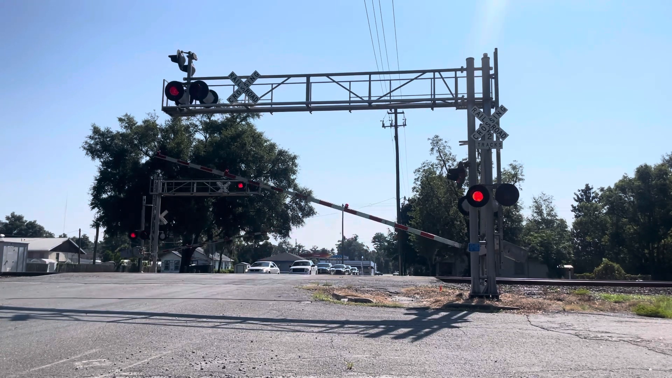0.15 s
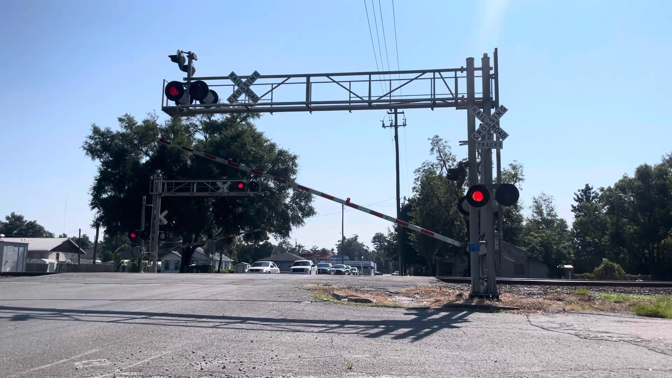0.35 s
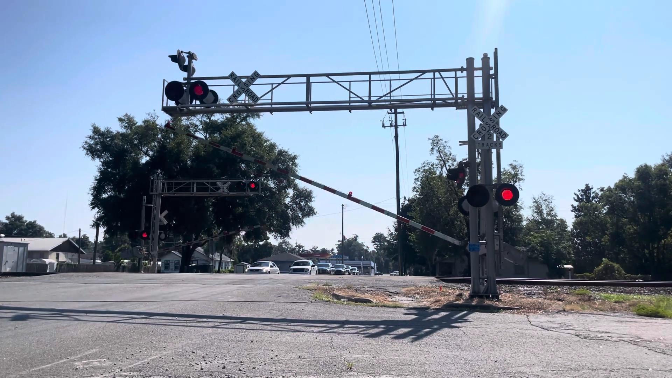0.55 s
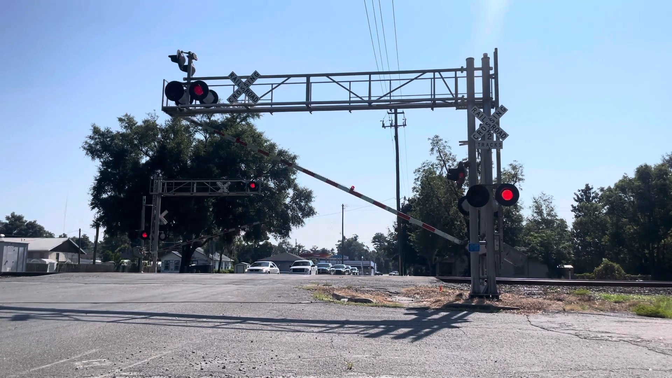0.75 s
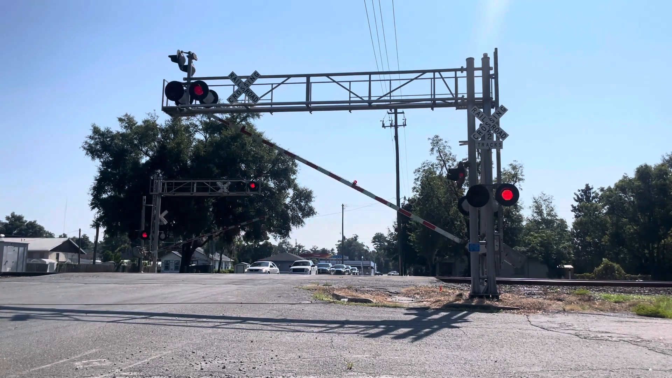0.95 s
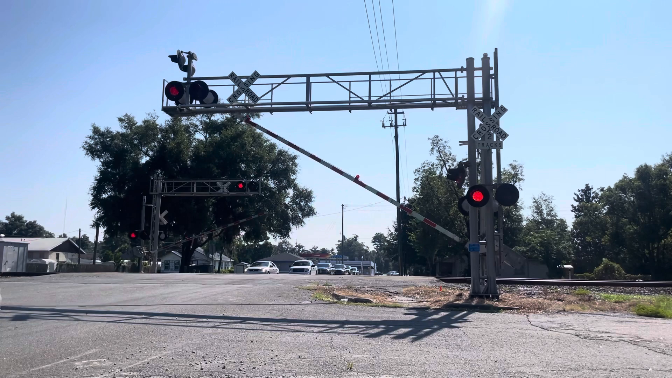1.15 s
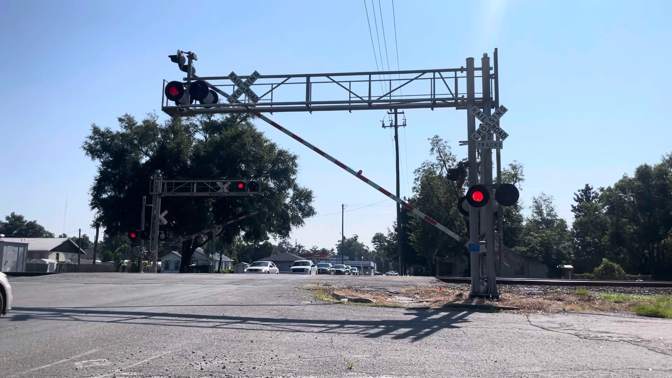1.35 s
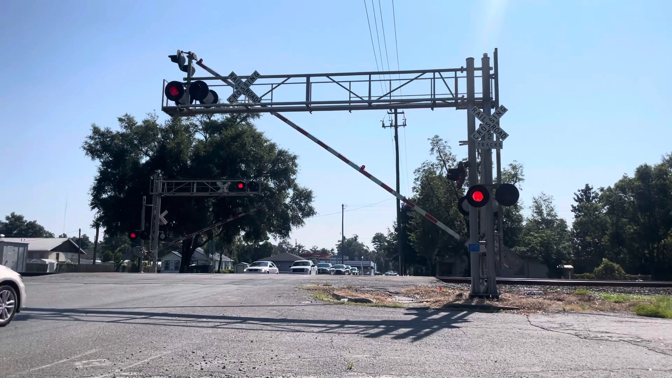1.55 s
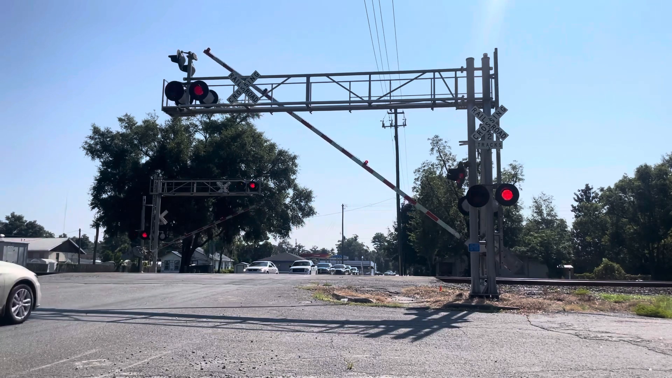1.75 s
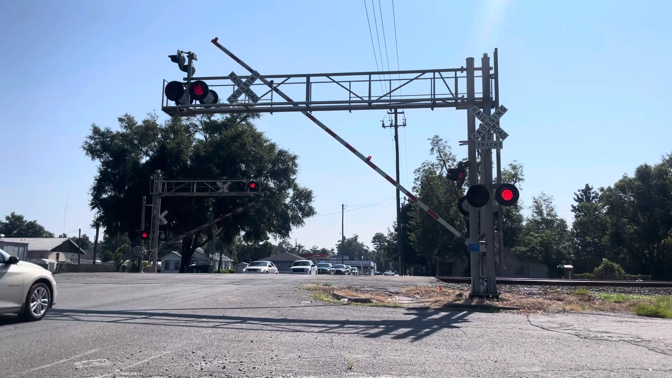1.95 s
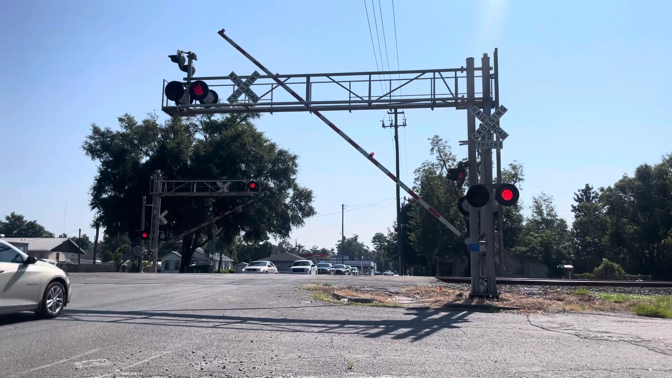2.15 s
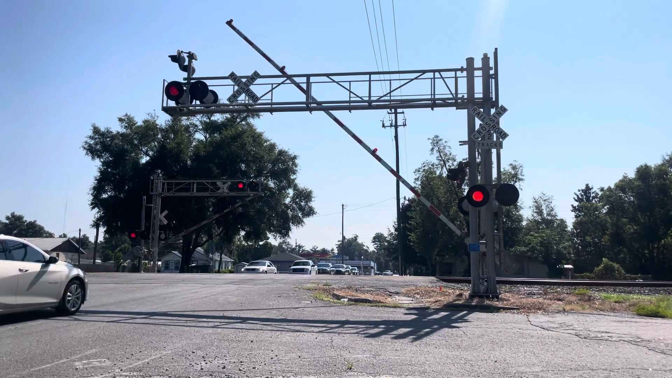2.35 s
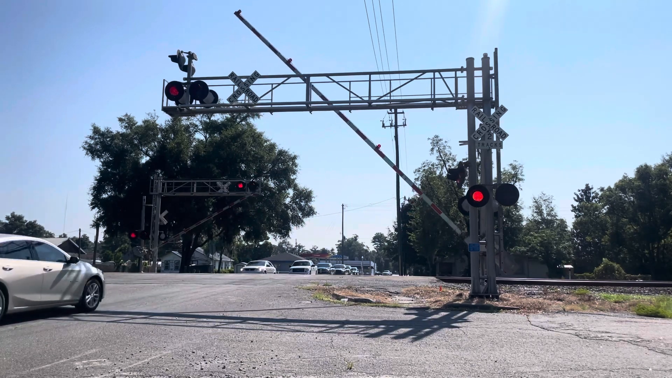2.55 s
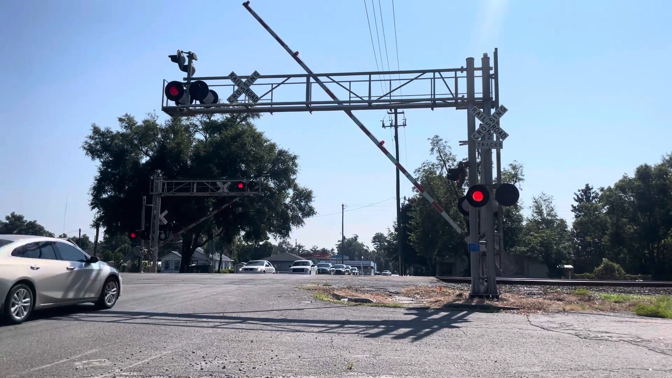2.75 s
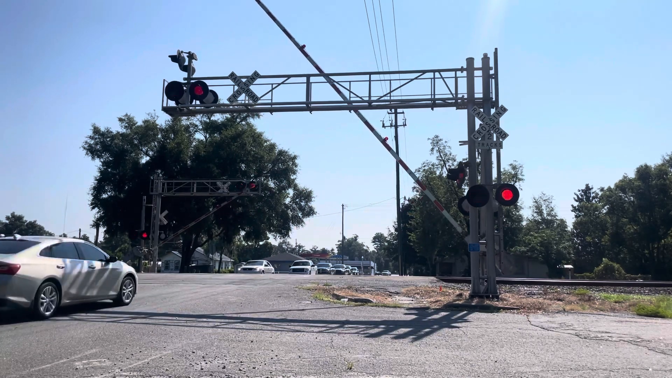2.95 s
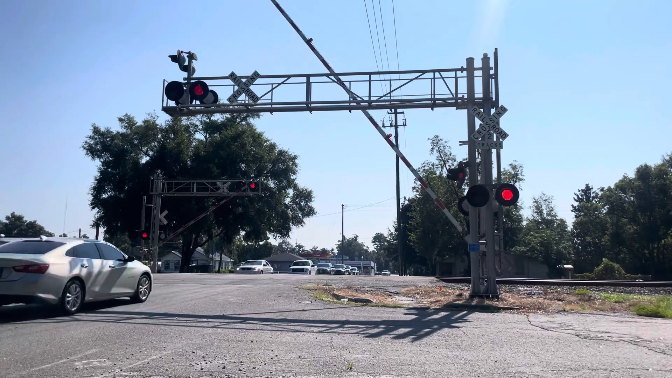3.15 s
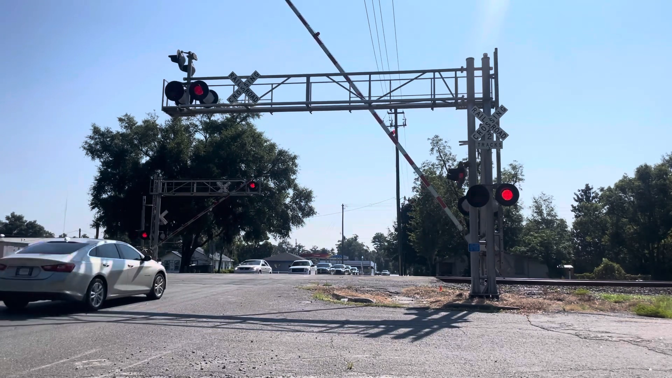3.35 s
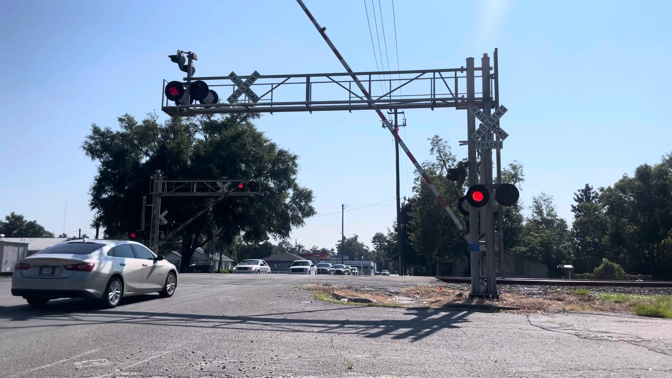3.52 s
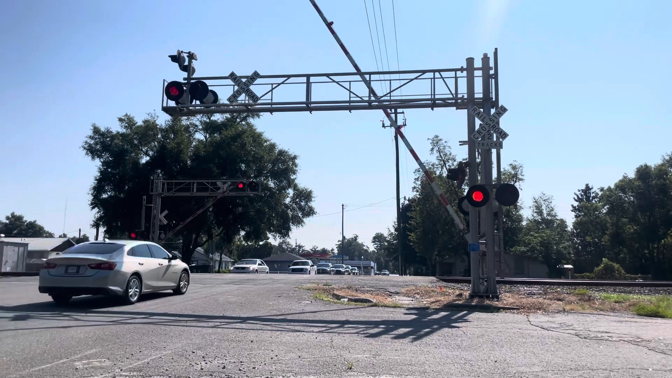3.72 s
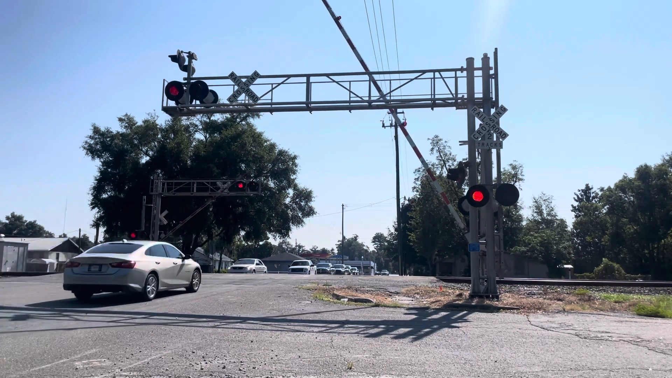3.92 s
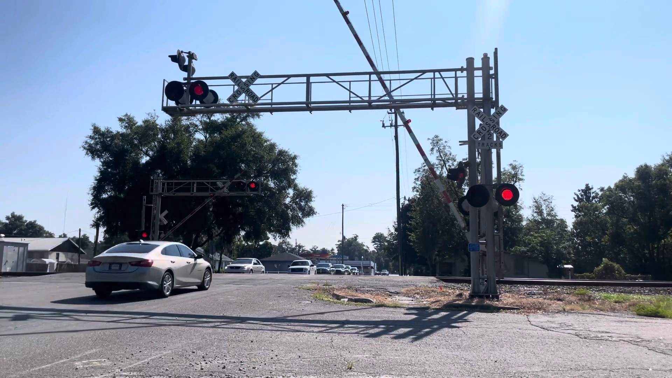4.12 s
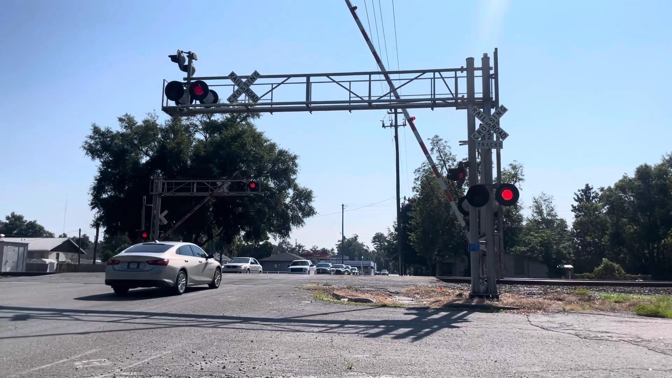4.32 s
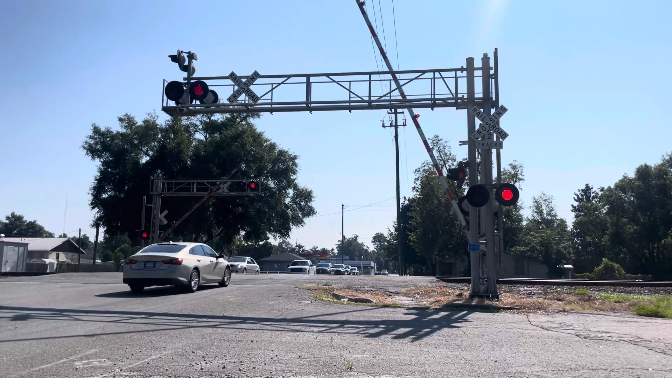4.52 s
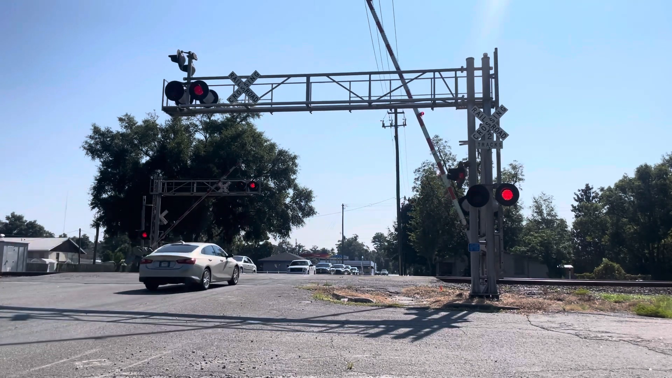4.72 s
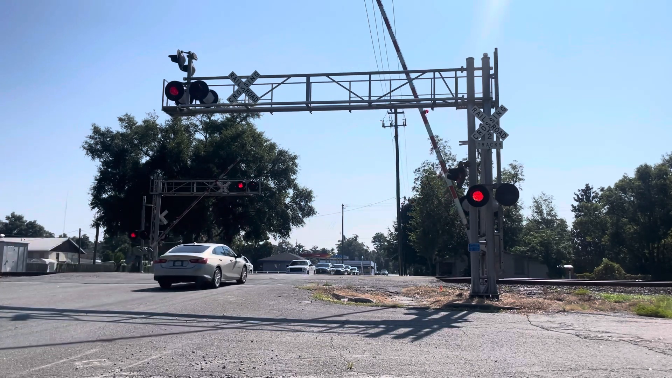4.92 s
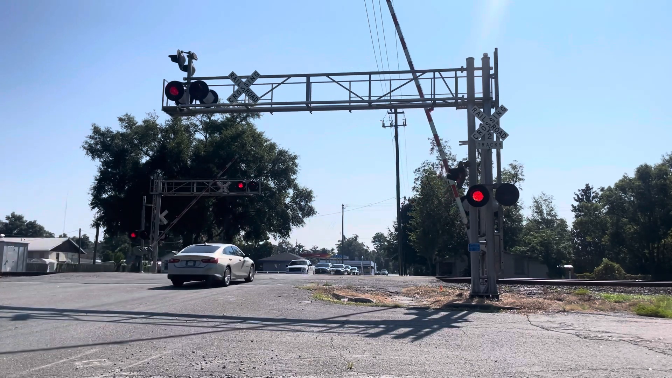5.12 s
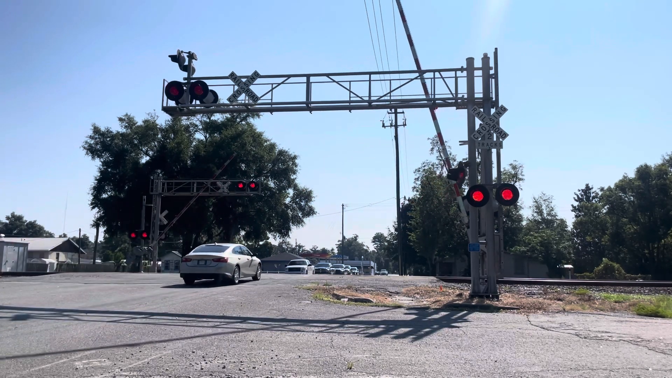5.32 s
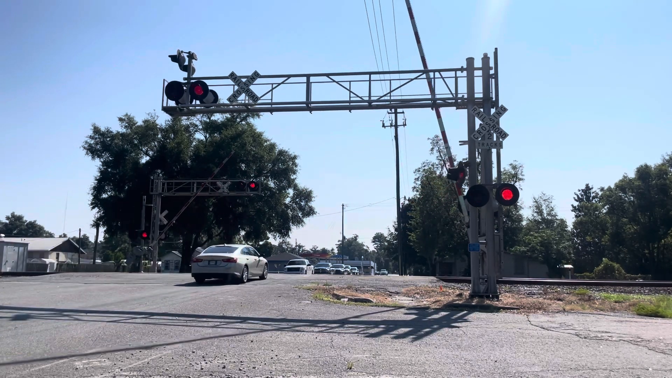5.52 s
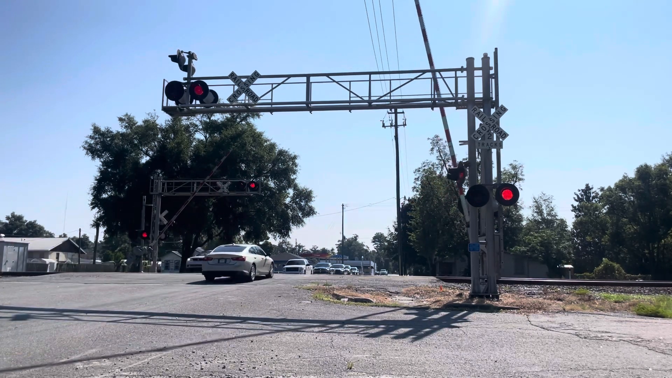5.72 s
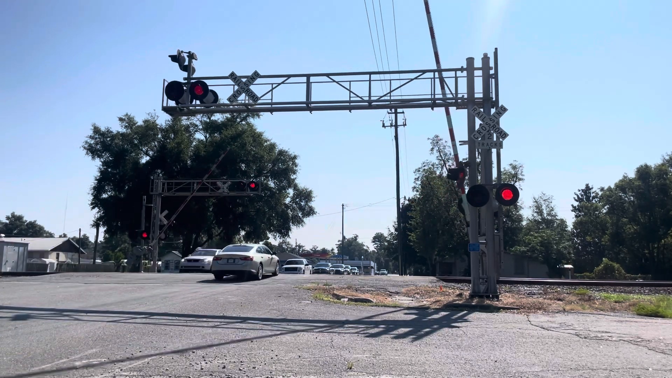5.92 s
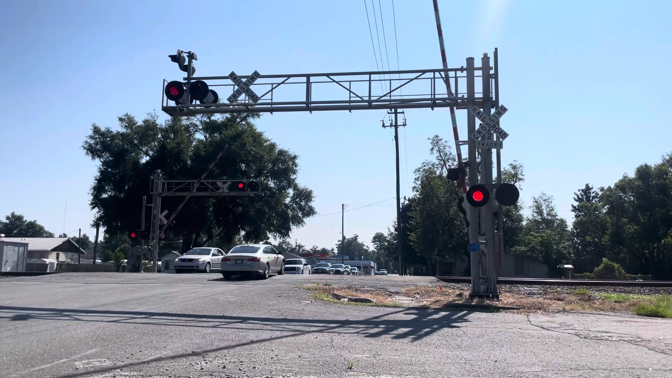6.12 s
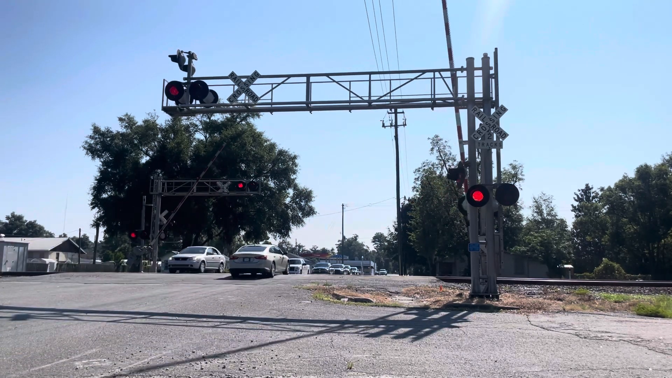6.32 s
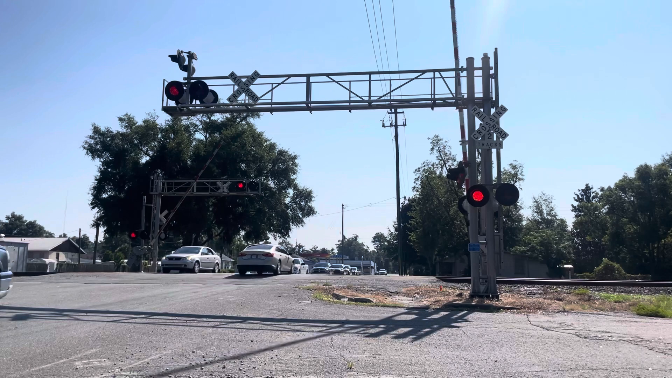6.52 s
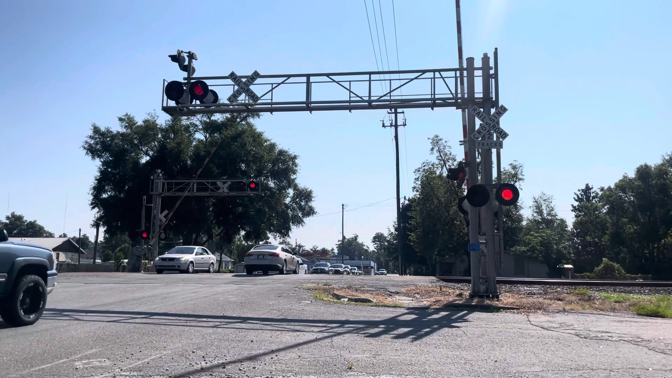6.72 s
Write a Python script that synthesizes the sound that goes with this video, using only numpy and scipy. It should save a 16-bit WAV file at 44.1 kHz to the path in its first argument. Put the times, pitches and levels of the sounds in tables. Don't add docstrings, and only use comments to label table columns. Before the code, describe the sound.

Quiet traffic rumble and faint brake squeaks, then a deep pickup exhaust surges, swells steadily nearer and rattles its metal bed hard.

```python
import sys
import numpy as np
from scipy import signal
from scipy.fft import rfft, irfft, next_fast_len
from scipy.io import wavfile
from scipy.ndimage import uniform_filter1d, minimum_filter1d, map_coordinates

SR = 44100
rng = np.random.default_rng(int(sys.argv[2]) if len(sys.argv) > 2 else 0)


def linear_from_db(decibels):
    return 10 ** (np.asarray(decibels, float) / 20)


def unload_audio(sound):
    columns = np.transpose(np.atleast_2d(sound))
    steps = np.round(np.clip(columns, -1, 1) * 32767)
    wavfile.write(sys.argv[1], SR, steps.astype(np.int16))


N = 302967
T = np.arange(N) / SR

# t/s, exhaust level/dB, overtones against the firing tone/dB
THROTTLE = [(0, -38, 3), (.63, -42, 6), (.93, -32, 0), (1.7, -33, -0.5), (2.05, -35, -2), (2.45, -34.5, 3),
            (2.56, -26.5, 0.5), (2.72, -19.5, -0.5), (2.9, -18, -1.5), (3.05, -17, -4), (3.6, -19, -0.5),
            (4.4, -17, 2), (4.75, -15.5, 0.2), (5.6, -15, 1.1), (5.9, -12.5, -2), (6.4, -9, -3),
            (6.87, -8.5, -8.5)]
# t/s, firing rate f/Hz
SPEED = [(.63, 35.2), (.93, 42.3), (1.7, 39.8), (2.43, 33.7), (2.7, 45.5), (3.02, 77.5), (3.21, 84.7),
         (3.67, 77.5), (4.1, 80.6), (4.4, 79.7), (4.72, 83.5), (5.0, 84.3), (5.32, 88.2), (5.6, 88.3),
         (5.85, 91.7), (6.15, 92.3), (6.47, 95.1), (6.87, 92)]
# t/s, nearness level/dB, lead of the left port/ms
APPROACH = [
    (0, -0.5, 1),
    (5, 0.5, 0.96),
    (5.7, 1.4, 0.81),
    (6.4, 5, 0.57),
    (6.87, 5.5, .38),
]
# f/Hz, level/dB
MUFFLER = [(39, -8), (62, -2), (90, 0.5), (115, -3.5), (145, -2), (185, -3), (240, -13), (330, -28.5)]
# multiple of the firing rate, level/dB
BURBLE = [(.375, -38), (.5, -37), (.625, -12), (.75, -30), (.875, -19), (1, 0), (1.125, -21), (1.25, -23),
          (1.375, -19), (1.5, -22), (1.625, -21), (1.75, -16), (1.875, -19), (2, 0), (2.125, -21),
          (2.25, -11), (2.375, -25), (2.5, -31), (2.625, -22), (2.75, -29), (2.875, -32), (3, 0),
          (3.125, -32), (3.25, -30), (3.375, -37), (3.5, -36), (3.625, -32), (3.75, -36)]
# f/Hz, level/dB
PIPE = [(15, -36.5), (35, -20), (55, -4.5), (90, -1.5), (200, 0.5), (300, -9.5), (450, -14.5), (600, -15.5)]
# t/s, centre f/Hz, level/dB, length/s
BARK = [(4.3, 415, -50, .3), (5.2, 460, -44, .55), (5.1, 358, -45, .22), (5.8, 287, -41, .4),
        (6.3, 325, -44, .35), (6.55, 415, -44, .4), (4.3, 288, -47, .3), (6.55, 248, -33, .3)]
BARK_HZ_PER_S, BARK_WIDTH_HZ = 47, 18
LOPE_DB, LOPE_BELOW_HZ, LOPE_SPAN_HZ = 2.5, 55, 15
BURBLE_DB, BURBLE_GROWS = -17, 0.44
CRUISE_DB, CRUISE_HZ = -7, (58, 70, 84.5, 88)
DULLING = 0.45

# f/Hz, level/dB
ROAR = [(140, -28.5), (230, -2), (291, -12), (393, -11), (462, -9), (609, -13.5), (803, -15), (871, -16.5),
        (1600, -28), (2080, -66), (3520, -120)]
ROAR_DB, ROAR_GROWS = -43, 0.17
# f/Hz, level/dB
FAN = [(2350, -21.5), (4000, -6.5), (5450, -7.5), (6650, -5), (7030, -8.0), (7650, -12), (8610, -16),
       (10000, -12.5), (11700, -14.5), (12300, -22.5), (16000, -50), (22000, -120)][:-2] + [(14000, -13.5),
       (15800, -23.5)]
SPIN_HZ = 81.4
FAN_DB, FAN_DB_PER_HZ, FAN_SPAN_HZ = -58.5, 0.393, 9
WHINE_DB, WHINE_DB_PER_HZ, WHINE_IDLE_DB = -62, 0.755, -76.5
# f/Hz, level/dB per Hz
TRAFFIC = [(12, -38.5), (20, -15.5), (65, -5.5), (145, -7.5), (170, -7), (308, -21), (500, -28.5),
           (650, -45), (1100, -120)]
# f/Hz, level/dB
TYRES = [(760, -42), (1300, -0.5), (1370, -15), (1690, -0.5), (1830, 0), (2040, -1.5), (2390, 1),
         (2530, -0.5), (2740, -1.5), (3360, -4.5), (4300, -22.5), (5590, -47.5), (9460, -120)]
# t/s, level/dB
ROLL = [
    (0, -58),
    (2.3, -57.5),
    (3.15, -53),
    (4.1, -52),
    (5.2, -52.5),
    (6, -55),
    (6.87, -53.5),
]
INSECTS_DB, INSECTS_HZ, INSECTS_WIDTH_HZ = -61, 5600, 1300
INSECTS_FADE_S, INSECTS_FADE_DB = (1.1, 2.0), -15

# t/s, level/dB, centre f/Hz, hold/s
SQUEALS = [
    (0.682, -51, 9670, 0.089),
    (1.57, -50.5, 9500, 0.066),
    (2.549, -51.5, 9500, 0.09),
]
SQUEAL_RISE_DB_S, SQUEAL_FALL_DB_S = 167, 188
# t/s, f/Hz, level/dB
CAR = [
    (0.7, 42.2, -59.5),
    (1, 46.3, -33),
    (1.3, 50.1, -44),
    (1.8, 55.7, -32),
    (2.3, 57.1, -38),
    (2.6, 61, -35),
    (2.9, 57.4, -53),
]
# start t/s, length/s, from f/Hz, to f/Hz, from level/dB, to level/dB
CHIRP = (2.455, .28, 6090, 6650, -60, -61)
# start t/s, length/s, from f/Hz, to f/Hz, from level/dB, to level/dB
CREAK = (4.09, .17, 4050, 2500, -70, -66)

# share of the engine cycle, level/dB
VALVES = [(0, 0), (.3, -7), (.64, -6)]
# t/s, peak level/dB, f/Hz
TICKING = [
    (2.64, -38, 6400),
    (3.1, -42, 6200),
    (3.6, -47, 5900),
    (4, -44, 5600),
    (4.6, -48, 5600),
]
TICK_S = 3.233
TICK_SCATTER_DB, TICK_SCATTER_HZ, TICK_T60_S = 2.5, 350, .01

# t/s, peak level/dB
KNOCKS = [(6.381, -20), (6.472, -18.5), (6.487, -17.5), (6.501, -16), (6.527, -16.5), (6.542, -19),
          (6.557, -19.5), (6.574, -28.5), (6.608, -22.5), (6.624, -29.5), (6.647, -33.5)]
# f/Hz, width/Hz, level/dB
BED = [(765, 20, -1.5), (930, 9, -14), (898, 21, -3.5), (967, 30, -5), (1057, 37, -12.5), (1227, 20, -10),
       (1350, 27, -13.5), (1480, 30, -21.5), (1597, 24, -14), (1760, 14, -16), (2100, 92, -27.5),
       (2090, 27, -13.5), (2626, 25, -43), (3060, 29, -25.5)]
RING_DB, KNOCK_T60_S = -7, 0.17
RATTLE_DB, RATTLE_GROWS = -30.5, 0.83
# t/s, level/dB
GONG = [
    (6.497, -28.5),
    (6.552, -26),
]
GONG_RISE_DB_S, GONG_FALL_DB_S, GONG_HOLD_S = 700, 550, .014

# f/Hz, side minus mid level/dB
PORTS = [(60, -20.5), (110, -22), (200, -3), (380, 0.5), (700, 5), (1290, 6.5), (2380, -5.5), (4400, -2),
         (8120, 2), (15000, 0)]
# f/Hz, share tied to it
LINK = [(60, .8), (250, 0.83), (500, .7), (1000, .6), (4000, .55), (9000, 0.41)]
# f/Hz, angle/rad
TURN = [(60, -0.5), (250, 1.46), (1050, 0.63), (1250, -1.5), (2600, -1.4), (3000, 2.3), (3800, 1),
        (4300, 3), (6500, 4.5)]


def unit(x):
    return x / np.sqrt(np.mean(x ** 2) + 1e-20)


def along(points, hz):
    f, v = np.transpose(points)
    return np.interp(np.log(hz + 1), np.log(f + 1), v)


def curves(rows, t=T):
    s, *cols = np.transpose(rows)
    return [np.interp(t, s, c) for c in cols]


def wobble(rate, t=T):
    return map_coordinates(rng.standard_normal(int(N * rate / SR) + 4), [t * rate])


def filtered(x, response):
    m = next_fast_len(N + 8192)
    return irfft(rfft(x, m) * response(np.fft.rfftfreq(m, 1 / SR)), m)[..., :N]


def hump(x, centre, width):
    return np.exp(-.5 * ((x - centre) / width) ** 2)


def colour(spectrum):
    return lambda hz: linear_from_db(along(spectrum, hz))


def noise(response, patchy_db):
    z = signal.stft(rng.standard_normal((2, N)), nperseg=512)[2]
    field = uniform_filter1d(rng.standard_normal(z.shape[1:]), size=2, axis=0)
    field = uniform_filter1d(field, size=50, axis=1)
    patchy = signal.istft(z * linear_from_db(patchy_db * unit(field)), nperseg=512)[1][:, :N]
    return unit(filtered(patchy, response))


def swell(s, db, hold_s, rise_db_s, fall_db_s):
    early = (s - hold_s / 2 - T).clip(0)
    late = (T - s - hold_s / 2).clip(0)
    return linear_from_db(db - rise_db_s * early - fall_db_s * late)


def glide(slip, fuzz_hz):
    s, length, from_hz, to_hz, from_db, to_db = slip
    hz, db = curves([(s, from_hz, from_db), (s + length, to_hz, to_db)])
    on = uniform_filter1d(1. * (T > s) * (T < s + length), size=600)

    def voice():
        phase = 2 * np.pi * np.cumsum(hz + fuzz_hz * wobble(200)) / SR
        return np.cos(phase) * linear_from_db(3.4 * wobble(60))

    return linear_from_db(db + 6) * on * np.array([voice(), voice()])


def tick_train(events):
    out, t = np.zeros((2, N)), T[:900]
    rise = np.minimum(t / .0005, 1)
    for s, db, hz in events:
        shake = 1 + .8 * rng.standard_normal((2, len(t)))
        ring = linear_from_db(db + 6 - 60 * t / TICK_T60_S) * rise * np.sin(2 * np.pi * hz * t)
        out[:, round(s * SR):][:, :len(t)] += ring * shake
    return filtered(out, lambda f: hump(f, 5900, 1100))


def engine():
    t = T[::21]
    level_db, tone_db = curves(THROTTLE, t)
    hz = uniform_filter1d(curves(SPEED, t)[0], size=200)
    lead_ms = curves(APPROACH, t)[1]
    burble_db = BURBLE_DB + BURBLE_GROWS * (level_db + 18.5)
    lope_db = LOPE_DB * np.clip((LOPE_BELOW_HZ - hz) / LOPE_SPAN_HZ, 0, 1)
    turn = 2 * np.pi * np.cumsum(hz) * t[1]
    out = np.zeros((2, len(t)))

    def firing_db(k):
        db = level_db + along(MUFFLER, k * hz) + tone_db * (k > 1)
        db = db - DULLING * (level_db + 33.5).clip(0) * (k > 2)
        return db + lope_db * wobble(4.08, t)

    def add(k, size, start):
        lead = np.pi * k * hz * lead_ms / 1000
        lean = linear_from_db(np.clip(k * hz / 160 - .3, 0, 1.6))
        for ch, sign in enumerate((1, -1)):
            tone = np.cos(k * turn + start + sign * lead) / np.cos(lead).clip(.5)
            out[ch] += np.sqrt(2) * size * lean ** sign * tone

    for k, db in BURBLE:
        k = round(8 * k) / 8
        drift = .12 * k * wobble(1.5, t)
        if k % 1 == 0:
            add(k, linear_from_db(firing_db(k) + 0.54 * wobble(6, t)), np.pi + 0.13 * drift)
        else:
            level = db + burble_db + along(PIPE, k * hz) - along(PIPE, k * 88) + 1.5 * wobble(2.5, t)
            level += CRUISE_DB * np.interp(hz, CRUISE_HZ, (0, 1, 1, 0)) * (1.4 < k < 2.2)
            add(k, linear_from_db(level), rng.uniform(0, 2 * np.pi) + drift)
    for k, db in ((4, 1.5), (5, -5), (6, -8)):
        add(k, linear_from_db(firing_db(k) + db + 1.5 * wobble(5, t)), np.pi)
    for k in np.arange(20, 50) / 8:
        band = 0
        for s, centre_hz, db, length in BARK:
            lifted_hz = centre_hz + BARK_HZ_PER_S * (t - s)
            band = band + linear_from_db(db) * hump(t, s, length) * hump(k * hz, lifted_hz, BARK_WIDTH_HZ)
        add(k, linear_from_db(2.0 * wobble(2.37, t)) * band + linear_from_db(burble_db - 64.5), 1.1 * wobble(2, t))
    return signal.resample_poly(out, 21, 1, axis=1)[:, :N], np.interp(T, t, turn)


def roar(turn):
    level_db = ROAR_DB + ROAR_GROWS * (curves(THROTTLE)[0] + 20) + curves(APPROACH)[0]
    puffs = 1 + 0.049 * np.cos(turn)
    return linear_from_db(level_db + 0.13 + 0.84 * wobble(14)) * puffs * noise(colour(ROAR), patchy_db=1.5)


def fan(turn):
    level_db = FAN_DB + FAN_DB_PER_HZ * (curves(SPEED)[0] - SPIN_HZ).clip(0, FAN_SPAN_HZ)
    puffs = 1 + 0.027 * np.cos(turn)
    return linear_from_db(level_db + 2.16 + .7 * wobble(8)) * puffs * noise(colour(FAN), patchy_db=1.8)


def whine():
    level_db = WHINE_DB + WHINE_DB_PER_HZ * (curves(SPEED)[0] - SPIN_HZ)
    level_db = np.maximum(level_db, WHINE_IDLE_DB)
    return linear_from_db(level_db - 3 + 1.2 * wobble(9)) * noise(lambda f: hump(f, 6830, 150), patchy_db=1.5)


def traffic():
    return linear_from_db(-32.0) * noise(colour(TRAFFIC), patchy_db=1.4)


def tyres():
    level_db, = curves(ROLL)
    return linear_from_db(level_db + .6 + .5 * wobble(12)) * noise(colour(TYRES), patchy_db=.9)


def insects():
    level_db = INSECTS_DB + np.interp(T, INSECTS_FADE_S, (0, INSECTS_FADE_DB))
    return linear_from_db(level_db) * noise(lambda f: hump(f, INSECTS_HZ, INSECTS_WIDTH_HZ), patchy_db=5.0)


def brakes():
    out = np.zeros((2, N))
    slips = (1 + np.cos(2 * np.pi * np.cumsum(205 + 12 * wobble(30)) / SR)) ** 0.57

    for s, db, c, hold_s in SQUEALS:
        def shape(f):
            bands = hump(f, c, 470) + linear_from_db(-5) * hump(f, c / 2, 400)
            return bands + linear_from_db(-7) * hump(f, 1.49 * c, 420) + linear_from_db(-6.5) * hump(f, 2580, 300)

        drag = swell(s, db, hold_s, SQUEAL_RISE_DB_S, SQUEAL_FALL_DB_S)
        out += drag * unit(noise(shape, patchy_db=1.5) * (.6 + slips))
    return out


def car():
    hz, db = curves(CAR)
    on = uniform_filter1d(1. * (T > CAR[0][0]) * (T < CAR[-1][0]), size=4000)
    return np.sqrt(2) * on * linear_from_db(db + 1.6 * wobble(3.8)) * np.cos(2 * np.pi * np.cumsum(hz) / SR)


def belt():
    return linear_from_db(-1) * glide(CHIRP, fuzz_hz=110)


def grit():
    luck = rng.uniform(size=(130, 3))
    when = 2.6 + 2.1 * luck[:, 0]
    peak_db = -55 - 2.5 * np.log(luck[:, 1] + .05)
    return tick_train(np.c_[when, peak_db, 5300 + 1300 * luck[:, 2]])


def valves(turn):
    cycle = (turn - np.interp(TICK_S, T, turn)) / (16 * np.pi)
    share, valve_db = np.tile(np.transpose(VALVES), 19)
    when = np.interp(np.repeat(np.arange(-4, 15), len(VALVES)) + share, cycle, T)
    peak_db, pitch_hz = curves(TICKING, when)
    scatter = rng.standard_normal((len(when), 2))
    peak_db = peak_db + valve_db + TICK_SCATTER_DB * scatter[:, 0]
    pitch_hz = pitch_hz + TICK_SCATTER_HZ * scatter[:, 1]
    when = when + .003 * rng.standard_normal(len(when))
    heard = (when > TICKING[0][0]) & (when < TICKING[-1][0])
    return tick_train(np.c_[when, peak_db, pitch_hz][heard])


def spring():
    return linear_from_db(2) * glide(CREAK, fuzz_hz=40)


def clank():
    blows, scrape, rattle = np.zeros((3, 2, N + SR))
    t = T[:SR // 4]
    for s, db in KNOCKS:
        fade = linear_from_db(db - 4 - 60 * t / KNOCK_T60_S) * np.minimum(t / .004, 1)
        rattle_db = RATTLE_DB + RATTLE_GROWS * (db + 21.5)
        for part, part_db in ((blows, RING_DB + 5.0), (scrape, 0), (rattle, rattle_db)):
            burst = fade * rng.standard_normal((2, len(t)))
            part[:, round(s * SR):][:, :len(t)] += linear_from_db(part_db) * burst

    def panels(f):
        total = 0
        for k, (c, w, db) in enumerate(BED):
            total = total + (-1) ** k * linear_from_db(db) * 1j * f * w / (c * c - f * f + 1j * f * w)
        return linear_from_db(22.0) * total

    def fizz(f):
        return linear_from_db(12.5) * hump(f, 5900, 1200) + linear_from_db(9.0) * hump(f, 10200, 700)

    ringing = filtered(blows[:, :N], panels)
    scraping = filtered(scrape[:, :N], lambda f: linear_from_db(-5.5) * hump(f, 1200, 1800))
    mid, side = ringing + scraping + filtered(rattle[:, :N], fizz)
    return np.array([mid + 0.23 * side, mid - 1.0 * side])


def gong():
    size = sum(swell(s, db, GONG_HOLD_S, GONG_RISE_DB_S, GONG_FALL_DB_S) for s, db in GONG)
    return np.sqrt(2) * size * np.cos(2 * np.pi * np.cumsum(734 + 5 * wobble(40)) / SR)


def ports(pair):
    def parts(hz):
        link = np.clip(along(LINK, hz), 0, 1)
        tied = link * np.exp(1j * along(TURN, hz))
        return linear_from_db(along(PORTS, hz)) * np.array([tied, np.sqrt(1 - link ** 2)])

    side = filtered(pair, parts).sum(axis=0)
    return np.array([pair[0] + side, pair[0] - side])


def scene():
    exhaust, turn = engine()
    spread = roar(turn) + fan(turn) + whine() + traffic() + tyres() + insects()
    spread += brakes() + belt() + grit() + valves(turn) + spring()
    return exhaust + car() + ports(spread) + clank() + gong()


def roll_off(x):
    return signal.sosfilt(signal.butter(12, 16660, fs=SR, output="sos"), x)


def record(dry):
    heard = filtered(dry, lambda hz: 1 / (1 + (36 / (hz + 1)) ** 5))
    gain = np.minimum(1, .83 / np.abs(heard).max(axis=0).clip(.1))
    gain = uniform_filter1d(minimum_filter1d(gain, size=1500), size=1500)
    mix = heard * gain
    return roll_off(mix)


dry = scene()
out = record(dry)
unload_audio(out)
```